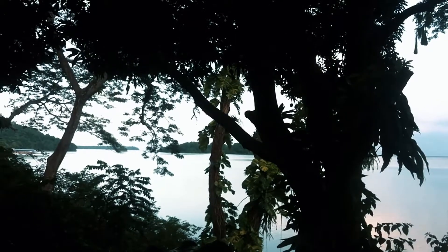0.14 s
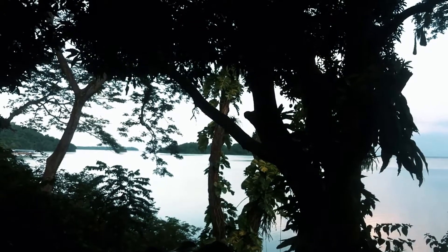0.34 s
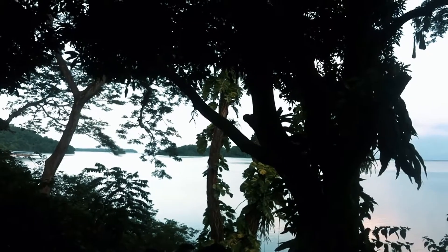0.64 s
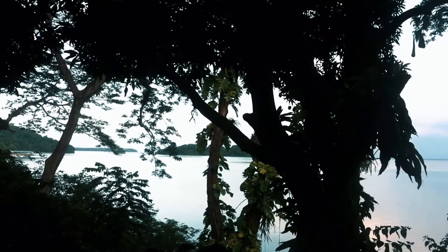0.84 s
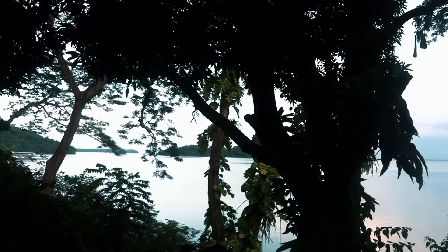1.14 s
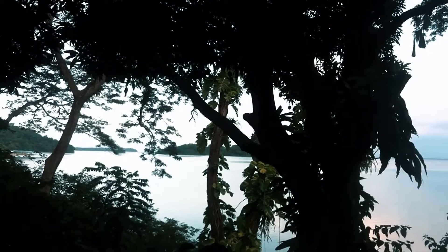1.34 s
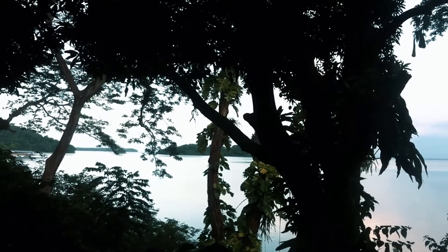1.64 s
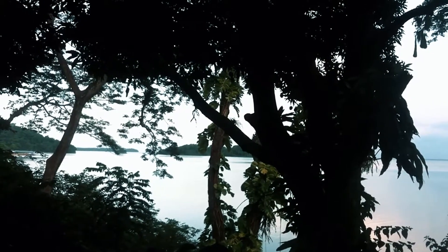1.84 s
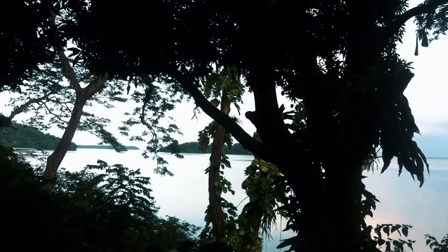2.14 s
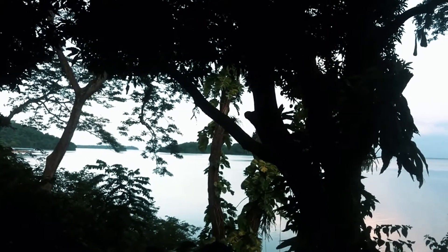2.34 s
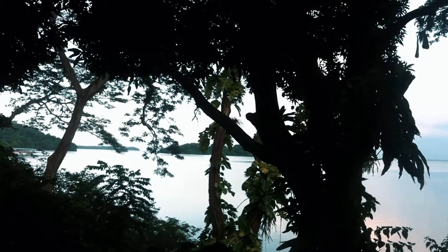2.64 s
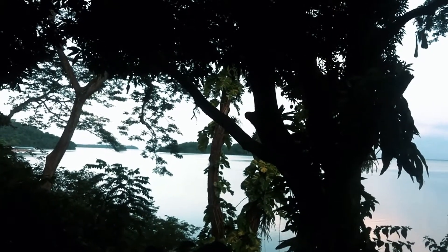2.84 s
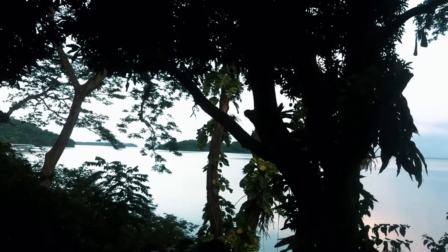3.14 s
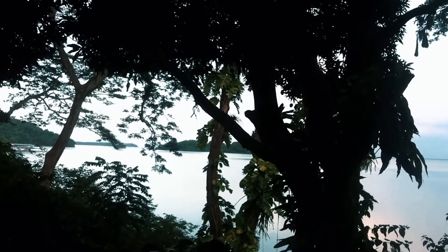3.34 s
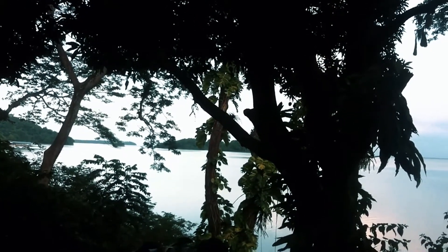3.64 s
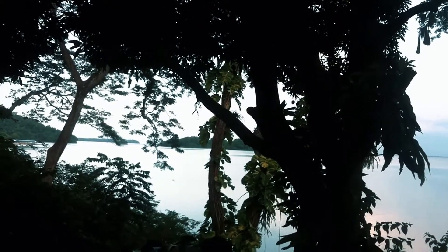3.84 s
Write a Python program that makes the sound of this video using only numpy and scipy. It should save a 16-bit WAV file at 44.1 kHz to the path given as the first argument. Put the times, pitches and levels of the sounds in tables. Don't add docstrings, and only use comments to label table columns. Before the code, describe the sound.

A bird sings three bright upward-scooped whistles, then a rapid jumble of squeaks, yelps and low yodels, close and clear with short tree echoes; soft clucks come earlier, over steady insect hiss and faint lakeside air.

```python
import sys
import numpy as np
from scipy import signal
from scipy.fft import rfft, irfft
from scipy.io import wavfile
from scipy.ndimage import uniform_filter1d

SR = 44100
rng = np.random.default_rng(int(sys.argv[2]) if len(sys.argv) > 2 else 0)


def field_ratio(decibels):
    return 10 ** (np.asarray(decibels, dtype=float) / 20)


def waveform_to_disk(signal):
    frames = np.transpose(np.atleast_2d(signal))
    scaled = np.clip(frames, -1, 1) * 32767
    samples = np.round(scaled).astype(np.int16)
    wavfile.write(sys.argv[1], SR, samples)


N = 4 * SR

# pitch_hz, level_db (per Hz)
AIR = [(20, -20), (50, -14), (171, -3.5), (400, -4.5), (650, -8), (3270, -11), (4200, -15), (7970, -9),
       (15600, -14)]
AIR_DB = -62
# pitch_hz, width_hz, level_db, throb_per_s
INSECTS = [
    (6090, 680, -69.5, 35),
    (8073, 470, -63.5, 55),
    (9530, 760, -63, 60),
    (12500, 1100, -74.5, 30),
]
THROB_DB = -0.5

# start_s, level_db, pitch_hz, second_harmonic_db
CLUCKS = [(0.043, -56, 1320, -9), (.41, -56.5, 1346, -10), (.973, -53, 1379, -4), (1.371, -61, 1600, 6),
          (1.704, -54, 1378, -9), (1.900, -51, 1262, -6), (2.191, -54, 1313, -4), (2.465, -47, 1350, -5),
          (2.520, -53, 1480, -6), (2.688, -50, 1700, -8), (2.774, -52, 1292, -3)]
CLUCK_HARMONICS = [-16, -16]
CLUCK_S, CLUCK_FALL, CLUCK_SNAP_DB, CLUCK_ECHO_DB = .018, .12, -5.5, -3.5

# start_s, length_s, from_hz, to_hz, level_db
FAR_TRILLS = [(.465, .06, 4100, 4400, -64.5), (.63, .28, 4900, 4500, -64), (.52, .13, 3900, 4600, -70),
              (.62, .25, 4000, 3650, -67), (.15, .2, 1900, 1900, -78), (.08, .3, 2650, 2400, -74),
              (1.0, .14, 2800, 2500, -75)]
FAR_PER_S, FAR_SWING, FAR_T60_S = 130, .13, .5

# pitch_hz, t60_s
WOODS = [(1000, .36), (2400, .42), (3300, 0.62), (6000, .62), (14000, .55)]
WOODS_GAP_S = .008

# start_s, length_s, from_hz, to_hz, level_db
WHISTLES = [(1.792, .012, 1900, 3100, -46), (1.802, .024, 3000, 3270, -38.5),
            (1.825, 0.053, 2652, 3257, -41.5), (1.883, 0.081, 2690, 3342, -41),
            (1.949, 0.045, 2690, 3358, -42.5), (2.131, .016, 1988, 3200, -47),
            (2.145, .042, 3000, 3256, -38.5), (2.184, 0.073, 2230, 3295, -38),
            (2.255, .03, 2998, 3454, -35), (2.286, .03, 3300, 3445, -39), (2.497, .014, 2000, 3150, -47),
            (2.508, .022, 3000, 3214, -38), (2.530, 0.037, 2800, 3195, -39),
            (2.566, 0.028, 2903, 3200, -33), (2.593, .014, 3100, 3200, -40), (2.612, .014, 2390, 3180, -41),
            (2.623, .042, 3050, 3197, -34.5)]
SQUEAKS = [(3.006, .06, 4900, 5126, -44.5), (3.288, 0.051, 4500, 5023, -47.5),
           (3.376, 0.028, 4840, 5190, -45.5), (3.567, .05, 4620, 5034, -45.5),
           (3.765, 0.032, 4745, 4943, -47), (3.845, .015, 5300, 5100, -51), (3.797, .04, 5000, 5150, -52),
           (3.874, .02, 4700, 4950, -48), (3.065, .1, 5150, 5170, -52), (2.248, 0.01, 5040, 5240, -49),
           (2.51, 0.028, 4550, 4870, -54)]
YELPS = [(2.968, .06, 2840, 3685, -45.5), (3.276, .04, 2810, 3750, -47), (3.556, .028, 3050, 3765, -48),
         (3.588, .022, 3660, 3456, -46.5), (3.756, 0.018, 2300, 3660, -48), (3.846, 0.019, 2950, 3497, -48),
         (3.89, .025, 3440, 3520, -54), (2.692, 0.021, 3160, 3968, -44)]
YODELS = [(3.113, 0.025, 1363, 2217, -46), (3.376, 0.044, 1550, 2340, -47.5),
          (3.483, .046, 1535, 2179, -42.5), (3.608, 0.011, 1890, 2040, -47), (3.664, .04, 1530, 2440, -42),
          (3.705, .018, 2250, 2420, -46), (3.889, 0.024, 1460, 2190, -44), (3.953, .047, 1665, 2520, -46),
          (3.844, 0.012, 1020, 2400, -47)]
RASPS = [
    (3.378, .05, 6100, 6400, -51),
    (3.78, .045, 6900, 6500, -53),
    (2.458, .03, 6800, 6000, -56),
]
SLIDES = [(3.183, .012, 2150, 1950, -50), (3.194, .012, 1600, 1200, -55), (3.345, .01, 1200, 2100, -56),
          (3.146, 0.025, 2270, 2690, -54), (3.19, 0.014, 2270, 1900, -48), (3.273, 0.009, 1600, 1620, -49),
          (3.286, .01, 1600, 1650, -50), (3.9, .008, 2200, 2700, -51), (3.554, 0.0094, 1586, 1646, -43.5),
          (3.756, .012, 1500, 2400, -52), (3.908, .009, 3500, 3500, -50), (3.803, .012, 2600, 1300, -57),
          (2.712, 0.022, 3906, 3215, -41.5), (2.749, 0.0667, 1396, 1169, -61.5),
          (2.45, 0.019, 3406, 3480, -45.5), (3.526, 0.03, 3770, 4020, -58), (3.802, 0.013, 3790, 2950, -50),
          (3.535, 0.064, 11600, 12200, -54), (3.914, 0.086, 11340, 12500, -57),
          (3.39, .014, 3600, 2900, -52), (3.72, .015, 1400, 2100, -56), (3.6, .012, 1700, 2300, -55),
          (3.348, .016, 3700, 2700, -51), (2.463, .01, 3500, 2000, -50)]
RUNUPS = [(3.051, .035, 1277, 1700, -53), (3.098, .019, 1280, 1375, -51), (3.353, .03, 1290, 1500, -57),
          (3.456, .03, 1297, 1540, -61), (3.634, .033, 1280, 1560, -56), (3.869, .025, 1273, 1600, -56),
          (3.926, .029, 1300, 1560, -56), (2.967, .013, 1384, 1750, -46), (3.0, .045, 1350, 1250, -63),
          (3.075, .03, 1800, 1500, -56), (3.67, .012, 1350, 1700, -55), (3.128, .012, 1300, 1600, -58),
          (2.725, .02, 1420, 1380, -58), (2.79, .035, 1300, 1180, -56)]
OVERTONES = [(3.29, .03, 9700, 9950, -51), (3.368, .035, 9500, 10250, -50), (3.567, .045, 9800, 10050, -51),
             (2.15, .035, 6400, 6510, -50), (2.528, .04, 6300, 6390, -49), (2.99, .04, 11000, 11150, -54),
             (3.365, .03, 14500, 15100, -58), (3.77, .05, 9700, 9900, -54), (2.66, .07, 6380, 6400, -54)]

WHISTLE_HARMONICS = [-16, -14.5, -13]
SQUEAK_HARMONICS = [-14]
YELP_HARMONICS = [-20, -16]
RUNUP_HARMONICS = [-8]
PURE = []

# scoop_s (over 1 means an even slide), loss_db (per octave off pitch),
# waver (share of pitch), flutter_db, skirt_db (rough edge), breath_db, echo_db
WHISTLING = (.004, 20, .004, 1.5, -11, -22, -5)
SQUEAKING = (.003, 21, .013, 3, -9, -16, -5)
YELPING = (.005, 9, .016, 3, -6, -15, -3)
YODELLING = (.004, 12, .01, 2.6, -9, -18, -7)
RASPING = (.01, 10, .03, 4, -8, -12, -2)
SLIDING = (12, .1, .03, 3, -6, -16, -2.5)
RUNNING = (12, 18, .022, 3, -7, -20, -4)

RISE_S, FALL_S = .005, .004
SKIRT_BELOW, SKIRT_WIDE_HZ = .92, 380
HARMONIC_SWAY_DB, HARMONIC_GRAIN = 2.1, .55
HARMONIC_START, BLOOM_S = .1, .018

# pitch_hz, level_db (per Hz)
BREATH = [(900, -34), (1700, -18), (3200, -15), (4000, -17), (5200, -7), (9700, -10.5), (13100, -11),
          (15500, -18)]
# start_s, length_s, hiss_db, hoarse_db
GUSTS = [
    (1.83, .19, -53, -64),
    (2.17, .2, -52.5, -63),
    (2.51, .24, -52.5, -64),
    (2.69, .15, -57, -59),
    (2.97, .16, -57, -60),
    (3.28, .17, -56, -58),
    (3.55, .11, -57, -60),
    (3.75, .25, -58, -63),
]
GUST_GRAIN_DB, GUST_ECHO_DB, HOARSE_HZ, HOARSE_WIDE_HZ = 1.5, 0.1, 2600, 1100


def read(points, hz):
    point_hz, value = np.transpose(points)
    return np.interp(np.log(hz + 1), np.log(point_hz + 1), value)


def evened(x):
    return x / np.sqrt(np.mean(x ** 2) + 1e-20)


def cut(x, start_s, count):
    return x[round(start_s * SR):][:count]


def add(mix, start_s, sound):
    part = cut(mix, start_s, len(sound))
    part += sound[:len(part)]


def coloured(points):
    gain = field_ratio(read(points, np.fft.rfftfreq(N, 1 / SR)))
    return evened(irfft(rfft(rng.standard_normal(N)) * gain, N))


def wander(span_s):
    size = round(span_s * SR)
    smooth = uniform_filter1d(rng.standard_normal(N), size)
    return evened(uniform_filter1d(smooth, size))


def band(x, hz, width_hz):
    offset = (np.fft.rfftfreq(len(x), 1 / SR) - hz) / width_hz
    return irfft(rfft(x) * np.exp(-offset ** 2), len(x))


def dusk():
    t = np.arange(N) / SR
    out = field_ratio(AIR_DB) * coloured(AIR) * field_ratio(1.1 * wander(.06))
    for hz, width_hz, db, rate in INSECTS:
        throb = np.sin(2 * np.pi * rate * t + 2 * wander(.05)) + .7 * wander(.1)
        chorus = evened(band(rng.standard_normal(N), hz, width_hz))
        out = out + field_ratio(db + THROB_DB * throb) * chorus
    return out


def clucks():
    out = np.zeros(N)
    t = np.arange(0, 3 * CLUCK_S, 1 / SR)
    fall = CLUCK_FALL * (np.exp(-t / 0.00372) - t / CLUCK_S / 4)
    shape = np.minimum(t / .003, 1) * np.exp(-(t / CLUCK_S) ** 2)
    for start_s, db, hz, second_db in CLUCKS:
        burst, grit = rng.standard_normal((2, len(t)))
        hoarse = .06 * evened(band(grit, 0, 200))
        turns = 2 * np.pi * np.cumsum(hz * (1 + hoarse + fall)) / SR
        tone = np.sin(turns)
        for number, part_db in enumerate([second_db] + list(CLUCK_HARMONICS), 2):
            tone = tone + field_ratio(part_db) * np.sin(number * turns)
        snap = evened(band(burst, 1800, 2200) - band(burst, 0, 450) + .2 * burst)
        add(out, start_s, field_ratio(db) * shape * (tone + field_ratio(CLUCK_SNAP_DB) * snap))
    return out


def tree_echoes(t60s):
    taps = np.zeros(SR)
    slots = np.arange(0, SR - 20, 20)
    taps[slots + rng.integers(0, 20, len(slots))] = rng.choice([-1., 1.], len(slots))
    hz, t, bands = signal.stft(taps, SR, nperseg=256)
    fading = bands * field_ratio(-60 * t / read(t60s, hz)[:, None])
    out = signal.istft(fading, SR, nperseg=256)[1]
    out = out * np.minimum(np.arange(len(out)) / SR / WOODS_GAP_S, 1)
    return out / np.linalg.norm(out)


def far_bird():
    out = np.zeros(N)
    waver = wander(1 / FAR_PER_S / 4)
    for start_s, length_s, low, top, db in FAR_TRILLS:
        t = np.arange(0, length_s, 1 / SR)
        dip = FAR_SWING * cut(waver, start_s, len(t)) ** 2 / 2
        hz = (low + (top - low) * t / length_s) * (1 - dip)
        swell = np.sin(np.pi * (t / length_s) ** .25)
        add(out, start_s, field_ratio(db) * swell * np.sin(2 * np.pi * np.cumsum(hz) / SR))
    echoes = tree_echoes([(1000, FAR_T60_S), (9000, FAR_T60_S)])
    return signal.fftconvolve(out, echoes)[:N] * 2


def voice(start_s, hz, top, db, harmonics, manner, chance):
    _, loss_db, waver_share, flutter_db, skirt_db, breath_db, _ = manner
    t = np.arange(len(hz)) / SR
    waver, flutter, rough, breath, *sway = (np.resize(cut(c, start_s, len(t)), len(t)) for c in chance)
    turns = 2 * np.pi * np.cumsum(hz * (1 + waver_share * waver)) / SR
    off_db = loss_db * abs(np.log2(hz / top))
    bloom = np.minimum(HARMONIC_START + t / BLOOM_S, 1)
    grain = 1 + HARMONIC_GRAIN * rough
    tone = np.sin(turns)
    for k, part_db in enumerate(harmonics):
        part_db = part_db + HARMONIC_SWAY_DB * sway[k] - 2 * off_db - flutter_db * flutter
        tone = tone + bloom * field_ratio(part_db) * grain * np.sin((k + 2) * turns)
    skirt = field_ratio(skirt_db) * rough * np.sin(SKIRT_BELOW * turns)
    sound = np.sqrt(2) * tone + skirt + field_ratio(breath_db) * breath
    level_db = db + flutter_db * flutter - off_db
    shape = np.clip(np.minimum(t / RISE_S, (t[-1] - t) / FALL_S), 0, 1)
    return field_ratio(level_db) * shape * sound


def gusts(breath, grain):
    out = np.zeros(N)
    hoarse = evened(band(breath[::-1], HOARSE_HZ, HOARSE_WIDE_HZ))
    for start_s, length_s, hiss_db, hoarse_db in GUSTS:
        air = cut(field_ratio(hiss_db) * breath + field_ratio(hoarse_db) * hoarse, start_s, round(length_s * SR))
        air = air * field_ratio(GUST_GRAIN_DB * cut(grain, start_s, len(air)))
        add(out, start_s, air * np.sin(np.pi * np.linspace(0, 1, len(air)) ** .65))
    return out


def singer():
    rough = evened(band(rng.standard_normal(N), 0, SKIRT_WIDE_HZ))
    breath = coloured(BREATH)
    sways = [wander(.02) for _ in WHISTLE_HARMONICS]
    chance = [wander(.002), wander(.003), rough, breath] + sways
    voices = ((WHISTLES, WHISTLE_HARMONICS, WHISTLING), (SQUEAKS, SQUEAK_HARMONICS, SQUEAKING),
              (YELPS, YELP_HARMONICS, YELPING), (YODELS, PURE, YODELLING),
              (RASPS, PURE, RASPING), (SLIDES, PURE, SLIDING),
              (RUNUPS, RUNUP_HARMONICS, RUNNING), (OVERTONES, PURE, YODELLING))
    direct, sent = np.zeros((2, N))
    for k, (rows, harmonics, manner) in enumerate(voices):
        scoop_s, *_, echo_db = manner
        own = np.roll(chance, k * N // 10, axis=1)
        for start_s, length_s, low, top, db in rows:
            t = np.arange(0, length_s, 1 / SR)
            left = 1 - t / length_s if scoop_s > 1 else np.exp(-t / scoop_s)
            sound = voice(start_s, top + (low - top) * left, top, db, harmonics, manner, own)
            add(direct, start_s, sound)
            add(sent, start_s, field_ratio(echo_db) * sound)
    air = gusts(breath, sways[0])
    return direct + air, sent + field_ratio(GUST_ECHO_DB) * air


def scene():
    floor, cluck, far = dusk(), clucks(), far_bird()
    song, sent = singer()
    echoes = signal.fftconvolve(sent + field_ratio(CLUCK_ECHO_DB) * cluck, tree_echoes(WOODS))[:N]
    return (song + cluck + echoes + far + floor)[None]


def low_pass(x):
    return signal.sosfilt(signal.butter(12, 15710, fs=SR, output="sos"), x)


def record(dry):
    lowpass = signal.firwin(301, 15900, window=("kaiser", 9), fs=SR)
    mix = signal.oaconvolve(dry, lowpass[None], "same")
    return low_pass(mix)


dry = scene()
out = record(dry)
waveform_to_disk(out)
```